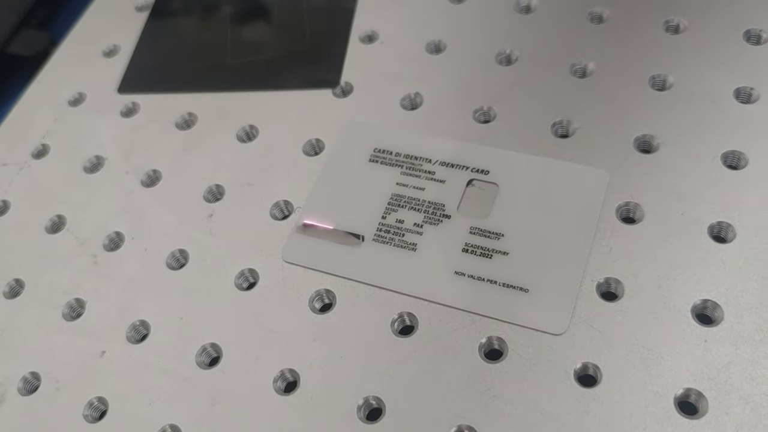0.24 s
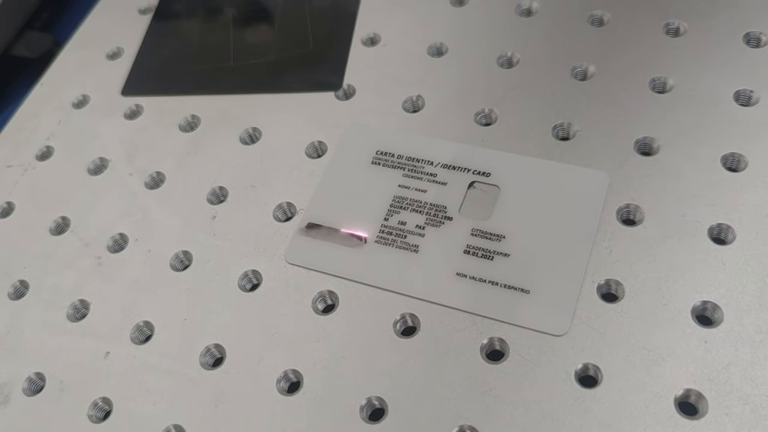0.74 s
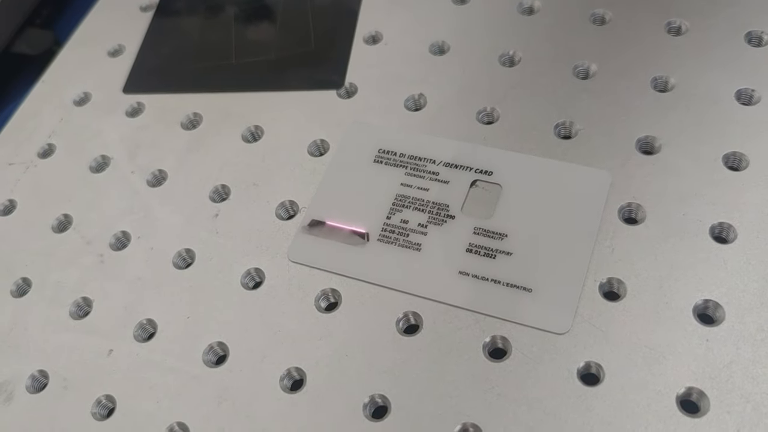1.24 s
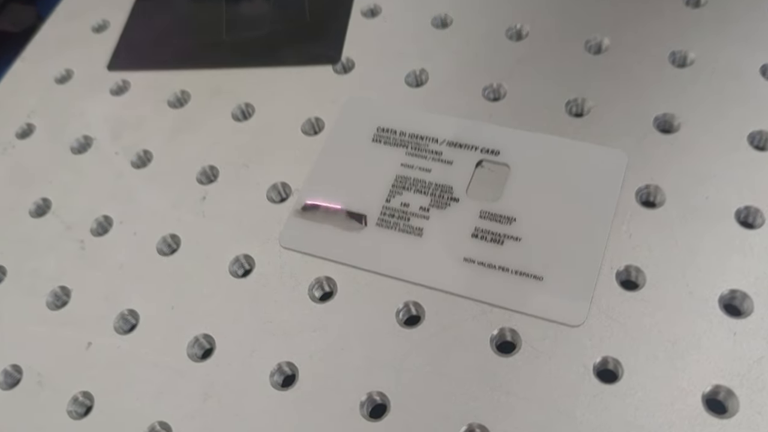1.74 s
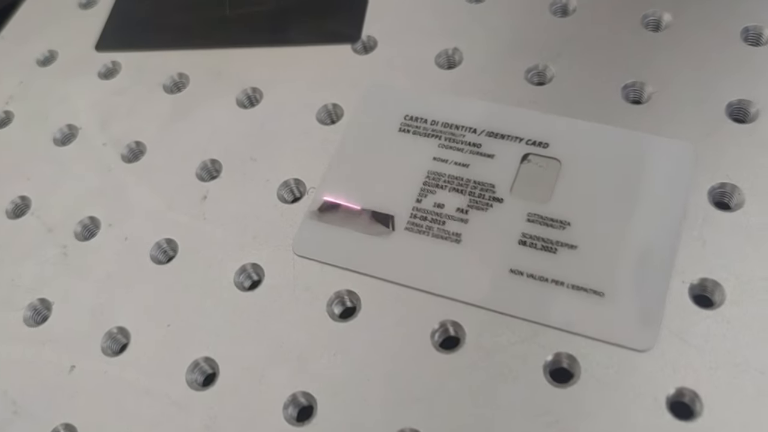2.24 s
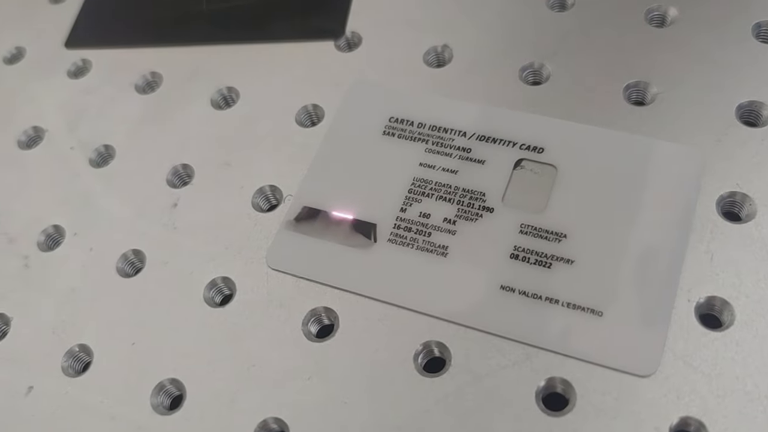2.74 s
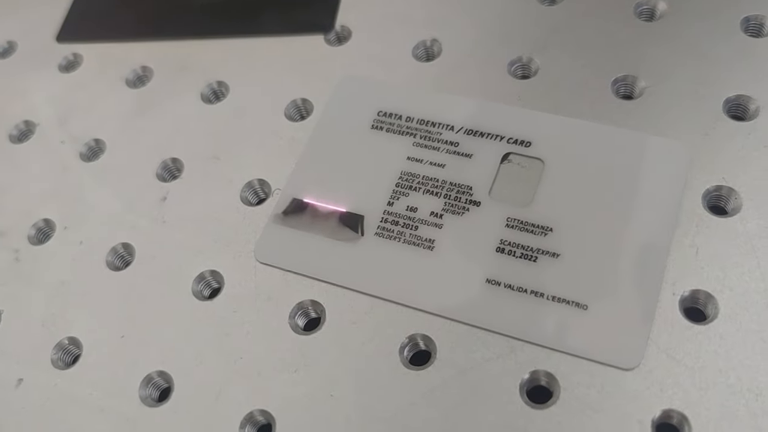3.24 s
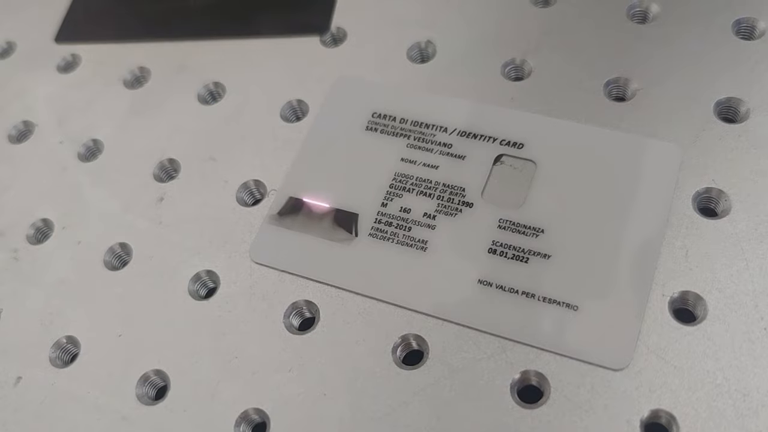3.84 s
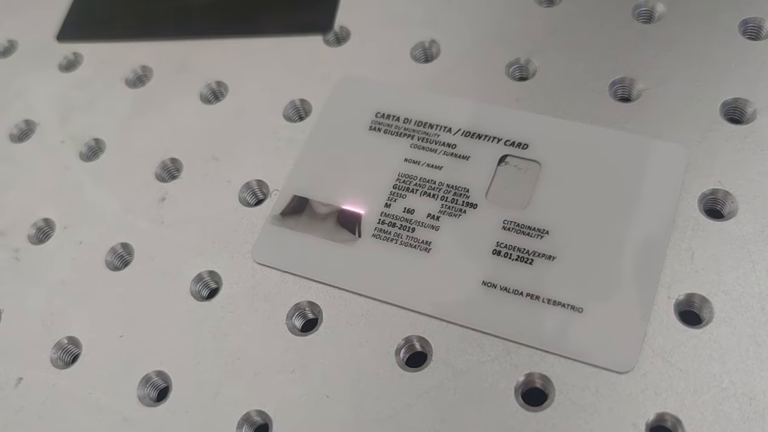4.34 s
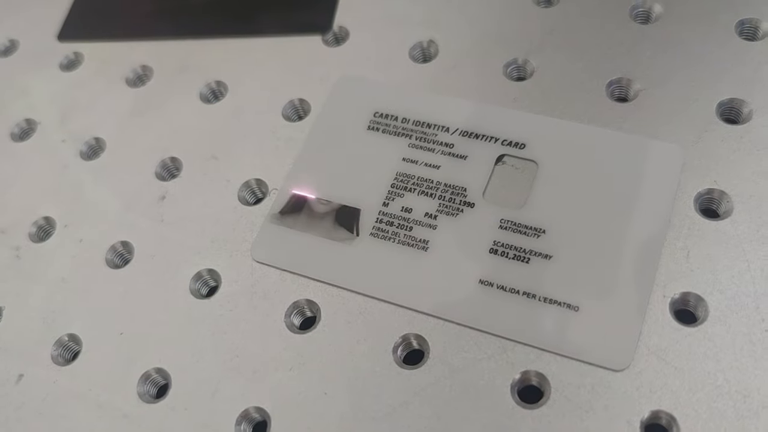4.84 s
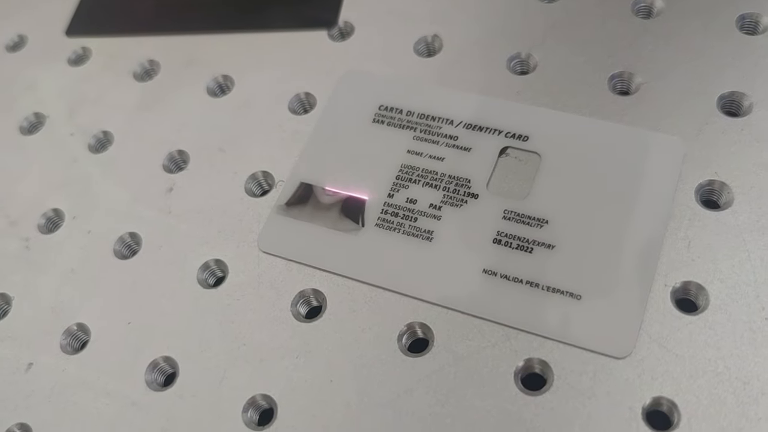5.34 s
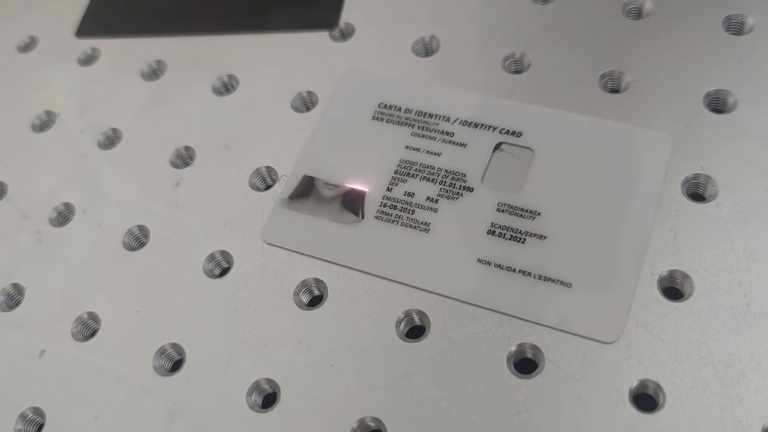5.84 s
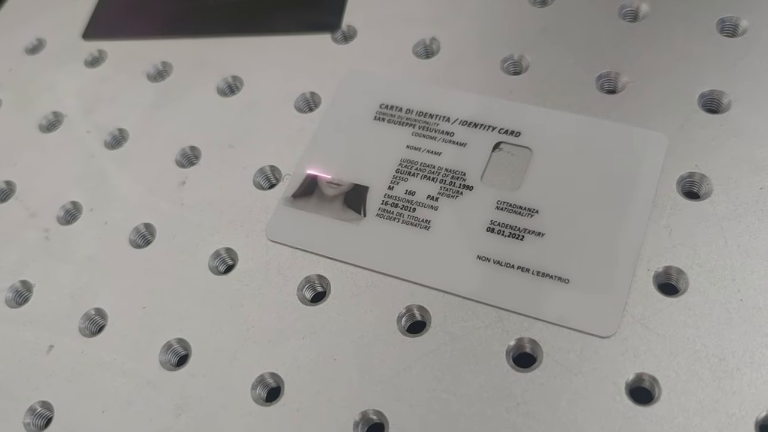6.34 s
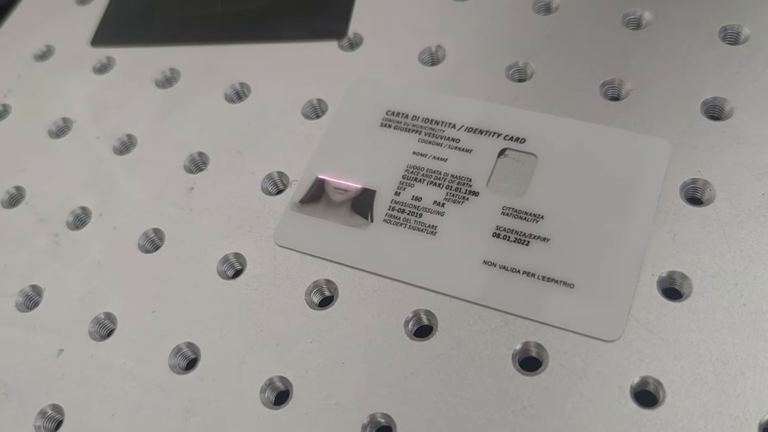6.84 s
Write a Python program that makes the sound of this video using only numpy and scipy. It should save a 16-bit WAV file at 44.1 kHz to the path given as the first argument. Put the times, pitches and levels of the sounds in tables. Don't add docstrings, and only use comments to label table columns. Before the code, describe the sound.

Continuous machine ventilation heard close on a handheld phone: low cabinet resonance shivering in quick irregular swells, mid-low fan tones wavering against each other, murmuring panels and soft turbulent hiss. A very faint high whine is present only at the start. Small crisp clicks occur sparsely, mostly on the left, while the hum and air continue unchanged in character until the end.

```python
import sys
import numpy as np
from scipy import signal
from scipy.fft import irfft, next_fast_len
from scipy.io import wavfile
from scipy.ndimage import uniform_filter1d, map_coordinates

SR = 44100
rng = np.random.default_rng(int(sys.argv[2]) if len(sys.argv) > 2 else 0)


def log_audio(samples):
    frames = np.atleast_2d(samples).T
    limited = np.clip(frames, -1, 1)
    pcm = np.round(limited * 32767).astype(np.int16)
    wavfile.write(sys.argv[1], SR, pcm)


def field_ratio(decibels):
    return 10 ** (np.asarray(decibels, dtype=float) / 20)


N = 313286


def read(points, hz):
    f, value = np.transpose(points)
    return np.interp(np.log(hz + 1), np.log(f + 1), value)


def curves(rows):
    s, *columns = np.transpose(rows)
    return [np.interp(np.arange(N) / SR, s, c) for c in columns]


# pitch_hz, lead_rad
PORT_LEAD = [(30, 0), (120, .03), (190, .16), (245, .83), (270, .35), (320, .62), (450, 1.1), (600, 1.2),
             (1000, 1.75), (1300, 3), (2000, 4.7), (2600, 7), (3800, 11.6), (6000, 14.5)]


def port_lead(hz):
    return read(PORT_LEAD, hz)


def drift(width_hz):
    points = 4096
    hz = np.fft.fftfreq(points, N / SR / points)
    noise = rng.standard_normal((points, 2)) @ [1, 1j]
    slow = np.fft.ifft(np.exp(-2 * (hz / width_hz) ** 2) * noise)
    slow /= np.sqrt(np.mean(abs(slow) ** 2))
    return np.interp(np.arange(N), np.arange(points) * N / points, slow)


def tone(hz, swing, left_db, right_db, right_phase):
    carrier = np.exp(2j * np.pi * np.cumsum(hz * np.ones(N)) / SR)
    z = np.sqrt(2) * swing * carrier * np.ones((2, 1))
    left = field_ratio(left_db) * z[0].real
    right = field_ratio(right_db) * (z[1] * np.exp(1j * right_phase)).real
    return np.array([left, right])


def fuzzy(table):
    size = next_fast_len(N)
    hz = np.fft.rfftfreq(size, 1 / SR)
    z = np.zeros((2, size // 2 + 1), complex)
    noise = rng.standard_normal((len(hz), 2)) @ [1, 1j]
    for centre_hz, width_hz, left_db, right_db, right_phase in table:
        near = slice(*np.searchsorted(hz, [centre_hz - 2 * width_hz, centre_hz + 2 * width_hz]))
        band = np.exp(-2 * ((hz[near] - centre_hz) / width_hz) ** 2) * noise[near]
        band *= size / np.sqrt(2 * np.sum(abs(band) ** 2))
        z[:, near] += np.outer([field_ratio(left_db), field_ratio(right_db) * np.exp(1j * right_phase)], band)
    return irfft(z, size)[:, :N]


def with_lead(table):
    return [(*row, port_lead(row[0])) for row in table]


def surges(rows, rest_hz, rest_db):
    level = np.full(N, field_ratio(rest_db))
    weighted_hz = rest_hz * level
    t = np.arange(N) / SR
    for centre_s, length_s, level_db, pitch_hz in rows:
        near = abs(t - centre_s) < length_s / 2
        swell = field_ratio(level_db) * np.cos(np.pi * (t[near] - centre_s) / length_s) ** 2
        level[near] += swell
        weighted_hz[near] += pitch_hz * swell
    return weighted_hz / level, level


def resonance(rows, rest_hz, rest_db, rough, width_hz, pan_db, apart):
    hz, level = surges(rows, rest_hz, rest_db)
    own = apart * drift(width_hz) * [[1], [-1]]
    swing = level * (1 + rough * drift(width_hz) + own) / np.sqrt(1 + rough ** 2 + apart ** 2)
    wandering_hz = hz + 2.2 * drift(9.0).real
    return tone(wandering_hz, swing, pan_db / 2, -pan_db / 2, port_lead(hz.mean()))


# centre_s, length_s, level_db, pitch_hz
LOWER_SURGES = [(0.08, 0.098, -38, 239.7), (0.2, 0.42, -42.5, 243.2), (0.52, 0.34, -39, 245.8),
                (0.73, 0.1, -35.5, 240.3), (0.82, 0.13, -38, 243.4), (0.84, 0.64, -54.5, 241.6),
                (0.96, 0.11, -41.0, 240.2), (1.05, 0.17, -37.5, 245.4), (1.16, 0.099, -43, 245.4),
                (1.28, 0.16, -39.5, 246), (1.33, 0.45, -48, 242), (1.42, 0.12, -41, 244.5),
                (1.64, 0.12, -42, 243.4), (1.75, 0.5, -41.5, 245.6), (1.78, 0.073, -41, 245.7),
                (2.04, 0.34, -48, 243.7), (2.24, 0.13, -43, 246), (2.51, 0.448, -44, 244.2),
                (2.59, 0.068, -42, 244.6), (2.71, 0.097, -46.5, 241.3), (2.91, 0.4, -41.5, 243),
                (3.14, 0.092, -38, 241.4), (3.31, 0.16, -41, 244), (3.39, 0.52, -44, 244.9),
                (3.48, 0.23, -43, 246.5), (3.7, 0.12, -36, 244.4), (3.86, 0.072, -48, 242.6),
                (4.04, 0.09, -44.9, 240.5), (4.1, 0.52, -36, 242.9), (4.39, 0.46, -51, 245.1),
                (4.49, 0.09, -41.5, 240.3), (4.56, 0.45, -49.5, 243), (4.65, 0.08, -37, 244.3),
                (4.73, 0.12, -39.1, 243.7), (4.86, 1, -46.5, 243.2), (4.91, 0.2, -39.5, 242.9),
                (5.1, 0.5, -45.5, 243.2), (5.12, 0.09, -42.9, 241.6), (5.34, 0.14, -38, 243.2),
                (5.45, 0.11, -42.5, 244.8), (5.57, 0.12, -39, 244), (5.78, 0.13, -39, 242.7),
                (6.01, 0.15, -47.5, 244.4), (6.08, 0.54, -39, 243.2), (6.17, 0.12, -43, 243.8),
                (6.35, 0.076, -36.5, 242.3), (6.45, 0.073, -39, 240.8), (6.51, 0.63, -47, 242),
                (6.62, 0.11, -41.6, 240.9), (7.0, 0.5, -39, 242.4)]
UPPER_SURGES = [(0.0, 0.09, -61, 265), (0.11, 0.18, -50, 266.3), (0.27, 0.18, -40, 265),
                (0.34, 0.28, -56, 267.5), (0.39, 0.15, -48.1, 262.3), (0.56, 0.29, -46, 264.7),
                (0.8, 0.15, -50.5, 269.6), (0.84, 0.44, -44.5, 267), (1.09, 0.09, -56, 267.5),
                (1.19, 0.095, -46, 271.8), (1.37, 0.28, -45, 269.9), (1.6, 0.17, -53.5, 269.8),
                (1.75, 0.15, -48, 270.3), (1.86, 0.085, -42, 268.7), (1.98, 0.34, -47, 268),
                (2.02, 0.098, -44.5, 267.7), (2.18, 0.09, -54, 266.3), (2.35, 0.25, -46, 268),
                (2.42, 0.46, -54.5, 267.6), (2.59, 0.25, -55, 270.2), (2.7, 0.38, -51.5, 266),
                (2.79, 0.13, -52, 266.1), (3.03, 0.5, -44, 266.6), (3.27, 0.4, -50.5, 270.6),
                (3.51, 0.48, -50, 264.6), (3.59, 0.096, -48, 265.7), (3.81, 0.13, -47, 266.4),
                (4.0, 0.53, -52.5, 265.3), (4.2, 0.09, -45, 267.3), (4.3, 0.096, -48.5, 270.0),
                (4.37, 0.28, -57.5, 266.2), (4.43, 0.086, -45.5, 268), (4.51, 0.09, -54.5, 266.3),
                (4.66, 0.18, -44.5, 268.5), (4.77, 0.12, -52.7, 266.6), (4.88, 0.083, -58, 269.7),
                (5.02, 0.18, -55.5, 273.6), (5.13, 0.091, -48, 270), (5.35, 0.35, -48, 267.2),
                (5.55, 0.14, -41, 268.3), (5.75, 0.09, -35, 267.8), (5.88, 0.35, -45.5, 265.2),
                (6.06, 0.13, -56, 267.4), (6.13, 0.35, -60, 270.3), (6.27, 0.14, -47.1, 271.1),
                (6.38, 0.087, -43, 265), (6.46, 0.09, -46, 267.0), (6.57, 0.19, -50, 268.2),
                (6.85, 0.25, -47.5, 263.5), (7.11, 0.55, -43.6, 264.5)]


def cabinet_boom():
    lower = resonance(LOWER_SURGES, rest_hz=243.5, rest_db=-48.5,
                      rough=.33, width_hz=30.0, pan_db=-3.0, apart=0.15)
    upper = resonance(UPPER_SURGES, rest_hz=269.0, rest_db=-56.0,
                      rough=.85, width_hz=26.0, pan_db=-5.5, apart=0.18)
    return lower + upper


# start_s, pitch_hz, level_db
WHISTLE = [(0, 2612, -70), (1, 2612, -68), (1.6, 2618, -69), (2, 2612, -68), (2.6, 2609, -66),
           (3.2, 2608, -66), (3.6, 2602, -66), (4.2, 2603, -69), (4.8, 2608, -67), (5.5, 2614, -66),
           (5.8, 2606, -67), (6.3, 2608, -67), (7.1, 2616, -67)]


def fans():
    whistle_hz, whistle_db = curves(WHISTLE)
    steady_share, wavering_share = .85, .45
    swing = field_ratio(whistle_db) * (steady_share + wavering_share * drift(14.0))
    whistle = tone(whistle_hz, swing, -1.5, 6.6, 1.6)
    return blade_tones(whistle_hz * 7 / 48) + whistle + shaft_orders(whistle_hz)


# start_s, slow_pitch_hz, slow_level_db, fast_level_db
BLADES = [(0.0, 374.59, -59.6, -56.8), (0.42, 374.28, -54.5, -50), (0.84, 374.93, -51.0, -55.5),
          (1.25, 371.96, -53.3, -56), (1.67, 371.78, -52.2, -57.3), (2.09, 371.01, -56.7, -49.4),
          (2.51, 372.11, -49.2, -55.3), (2.92, 372.55, -50.5, -57), (3.34, 372.77, -52.5, -51),
          (3.76, 372.96, -52.7, -48.6), (4.18, 375.28, -54, -50), (4.59, 374.93, -52, -53),
          (5.01, 373.82, -52.3, -56.8), (5.43, 373.1, -51.0, -56.1), (5.85, 374.83, -54.5, -51),
          (6.26, 373.08, -47.6, -55.1), (6.68, 376.25, -53.3, -56.2), (7.1, 374.05, -60.8, -53.2)]


def blade_tones(fast_hz):
    slow_hz, slow_db, fast_db = curves(BLADES)
    out = np.zeros((2, N))
    for hz, level_db in ((slow_hz, slow_db), (fast_hz, fast_db)):
        out += tone(hz, field_ratio(level_db) * (1 + .2 * drift(6.5)), -0.1, 0.98, 0.98)
    return out


# multiple, left_db, right_db, right_phase_rad
SHAFT_ORDERS = [(38, -90, -81, -1.9), (39, -79, -74, -1.7), (40, -77, -76, -2.4), (41, -74, -76, -0.9),
                (42, -72, -72, -0.8), (43, -78, -69, 0.1), (44, -77, -71, 0.5), (45, -79, -71, -2.7),
                (46, -83, -71, 1.9), (47, -76, -71, 0.1), (49, -77, -71, 1.3), (50, -84, -70, 1.2),
                (51, -81, -69, -0.9), (52, -87, -78, -0.3), (53, -81, -83, -0.5), (54, -90, -74, 0.5),
                (55, -80, -72, 1.4), (56, -87, -75, -1.6), (58, -85, -79, 2.7), (60, -83, -74, 2.8),
                (62, -84, -72, -2.8), (64, -90, -77, -1.7), (65, -90, -77, -1.3), (66, -86, -75, -2.4),
                (70, -84, -80, 0.1), (74, -87, -79, 0.6), (78, -90, -80, -0.9)]


def shaft_orders(whistle_hz):
    shaft_hz, width_hz = 54.34, 6.0
    steady = fuzzy([(k * shaft_hz, width_hz, *rest) for k, *rest in SHAFT_ORDERS])
    turned = np.cumsum(whistle_hz / (48 * shaft_hz))
    return np.array([map_coordinates(port, [turned], order=2, mode="mirror") for port in steady])


# pitch_hz, width_hz, left_db, right_db
PANELS = [(73, 8, -67, -66), (154, 14, -63, -60), (185, 14, -59.5, -57.5), (222, 16, -60, -58),
          (318, 26, -56, -55.5), (412, 25, -62, -63), (538, 30, -62, -60), (759, 11, -65.5, -60),
          (905, 100, -60, -55), (1119, 16, -66, -71)]


def panels():
    return fuzzy(with_lead(PANELS))


# pitch_hz, level_db per Hz
AIR_LEFT = [(25, -93), (45, -86), (95, -80), (205, -77), (345, -72.5), (475, -81), (600, -76.5),
            (710, -80.5), (820, -84), (1030, -80.5), (1230, -84.5), (1900, -90), (2800, -93.5), (3700, -99),
            (4300, -100.7), (5500, -104.4), (6600, -105.2), (7200, -101.5), (7600, -98.5), (8100, -96.5),
             (8500, -99), (9000, -102.7), (10300, -107), (11400, -114), (12300, -112), (14000, -112),
             (15000, -114.5), (15700, -112)]
AIR_RIGHT = [(25, -89), (45, -81.5), (95, -80), (205, -74), (345, -70), (475, -76.5), (600, -73.5),
             (710, -81.5), (820, -84.5), (1030, -84.5), (1230, -84.5), (1900, -87), (2800, -86),
             (3700, -88),
             (4300, -96), (5500, -100.7), (6600, -105.3), (7200, -112.2), (7600, -118), (8100, -119.5),
              (8500, -118), (9000, -118), (10300, -114), (11400, -115.5), (12300, -113.5), (14000, -113),
              (15000, -115), (15700, -112)]
# pitch_hz, likeness from 0 to 1
LIKENESS = [(30, .9), (75, .88), (150, .82), (190, .93), (320, .92), (450, .8), (600, .84), (720, .6),
            (930, .6), (1200, 0.36), (2000, 0.35), (2400, .2), (4000, 0.25), (15000, 0)]


def air():
    frames = N // 512 + 5
    hz = np.fft.rfftfreq(2048, 1 / SR)
    frame_s = np.arange(frames) * 512 / SR
    a, b, c, d, chance = rng.standard_normal((frames, 1025, 5)).T

    sway = uniform_filter1d(uniform_filter1d(chance[::-1], size=9, axis=0), size=70, axis=1)
    patches = uniform_filter1d(uniform_filter1d(chance, size=16, axis=0), size=8, axis=1)
    swell = uniform_filter1d(rng.standard_normal(frames), size=12)
    field_db = 0.58 * patches / patches.std() + 0.41 * swell / swell.std()
    field_db = field_db + 1.5 * sway / sway.std() * (hz < 3000)[:, None]
    field_db = field_db + rumble_gusts_db(hz, frame_s) + workshop_db(hz, frame_s)

    same = np.clip(read(LIKENESS, hz), 0, 1)[:, None]
    left = a + 1j * b
    shared = same * left * np.exp(1j * port_lead(hz))[:, None]
    right = shared + np.sqrt(1 - same ** 2) * (c + 1j * d)
    colour_db = np.array([read(AIR_LEFT, hz), read(AIR_RIGHT, hz)])
    z = np.array([left, right]) * field_ratio(colour_db[:, :, None] + field_db + 16.0)
    return signal.istft(z, nperseg=2048, noverlap=1536)[1][:, :N]


# start_s, level_db
RUMBLE = [(0.0, -68), (0.22, -71), (0.39, -55.5), (1.16, -70), (1.88, -66), (2.33, -68), (3.4, -66.5),
          (3.52, -69), (3.72, -82), (3.85, -62), (4.57, -75), (5.02, -63), (5.38, -67), (5.52, -63),
          (5.77, -71), (6.49, -60), (6.82, -65), (7.1, -76)]


def rumble_gusts_db(hz, frame_s):
    rumble_db = np.interp(frame_s, *np.transpose(RUMBLE))
    return (rumble_db - rumble_db.mean()) * (hz < 75)[:, None]


# pitch_hz, width_hz, left_db, right_db
WHINE = [(4250, 25, -90, -80), (5050, 350, -82, -79), (7080, 260, -77, -92), (7660, 150, -81, -100),
         (9430, 200, -84, -97)]


def whine():
    return fuzzy(with_lead(WHINE)) * np.interp(np.arange(N) / SR, (1.8, 2.4), [1, 0])


# start_s, level_db, brightness_db
TICKS = [(.2664, -62, -8), (.9573, -60, -4), (2.0924, -58, -5), (2.1662, -59, -5), (2.3854, -56, -9),
         (2.5112, -54, -6), (2.8534, -63, -1), (3.1431, -64, -1), (3.3151, -60, -6), (3.3561, -70, 2),
         (3.4544, -52, -5), (3.9021, -51, -6), (3.9544, -69, 5), (4.3517, -64, -1), (4.6127, -67, -4),
         (5.2587, -59, -3), (5.427, -52, -4), (5.6682, -50, -4), (5.6868, -64, -4), (5.8505, -62, -5),
         (5.8618, -57, -5), (6.2469, -57, -11), (6.2648, -65, -10), (6.2795, -52, -6), (6.2926, -64, -11),
         (6.4798, -55, -2), (6.5062, -61, -4), (6.6407, -61, -6), (6.9297, -61, -7), (6.957, -63, -2),
         (6.9646, -56, -6)]
# low_hz, high_hz, right_db
TICK_BANDS = [(7300, 11000, -22), (11000, 18500, -15)]


def ticks():
    length, t60_s = 300, .008
    out = np.zeros((2, N + length))
    decay = field_ratio(-60 * np.arange(length) / SR / t60_s)
    rattles = rng.standard_normal((len(TICKS), length)) * decay
    rattles[:, 0] = 4.5
    for band, (low_hz, high_hz, right_db) in enumerate(TICK_BANDS):
        sos = signal.butter(4, [low_hz, high_hz], "bandpass", fs=SR, output="sos")
        rung = signal.sosfilt(sos, rattles)
        for (start_s, level_db, bright_db), rattle in zip(TICKS, rung):
            band_db = 18.5 + level_db + band * (bright_db + 2.5)
            heard = field_ratio(band_db + np.array([0, right_db]))
            start = round(start_s * SR)
            out[:, start:start + length] += np.outer(heard, rattle / np.linalg.norm(rattle))
    return out[:, :N]


# start_s, level_db
WORKSHOP = [(0, -5), (.8, -2), (1.3, 1), (1.7, 2), (2.4, 1.5), (3, -1), (4, -1.5), (4.9, -1), (5.7, -1.5),
            (6.1, 2), (6.6, 0), (7.1, -0.5)]


def workshop_db(hz, frame_s):
    band = np.exp(-(np.log((hz + 1) / 1300.0) / 0.27) ** 2)
    return np.outer(band, np.interp(frame_s, *np.transpose(WORKSHOP)))


def scene():
    return cabinet_boom() + fans() + panels() + air() + whine() + ticks()


def low_pass(x):
    return signal.sosfilt(signal.butter(12, 15745, fs=SR, output="sos"), x)


# pitch_hz, level_db per Hz
GATE = [(6000, -130), (7300, -116), (8300, -116), (9000, -118), (10300, -115.5), (11500, -115),
        (13000, -116), (14800, -115.5), (15300, -113), (15700, -110.5)]


def record(dry):
    x = signal.sosfilt(signal.butter(3, 33.0, "highpass", fs=SR, output="sos"), dry)
    x = x * np.minimum(np.arange(N)[::-1] / (.0015 * SR), 1)
    hz, t, z = signal.stft(x, SR, nperseg=1024, noverlap=512)
    density = abs(z) ** 2 * 1024 / SR * 4 / 3
    patches = density[:, :512].reshape(2, 64, 8, -1).mean(2).repeat(8, axis=1)
    extra_db = 10.0 * np.outer(hz[:512] > 14300, t > 5.7)
    gate_db = read(GATE, hz[:512])[:, None] + extra_db
    z[:, :512] *= (patches > field_ratio(2 * gate_db)) & (hz[:512, None] < 15760)
    mix = signal.istft(z, SR, nperseg=1024, noverlap=512)[1][:, :N]
    return low_pass(mix)


dry = scene()
out = record(dry)
log_audio(out)
```